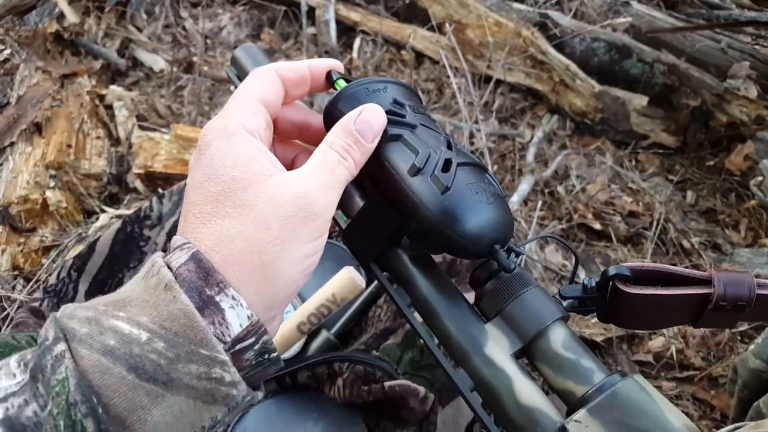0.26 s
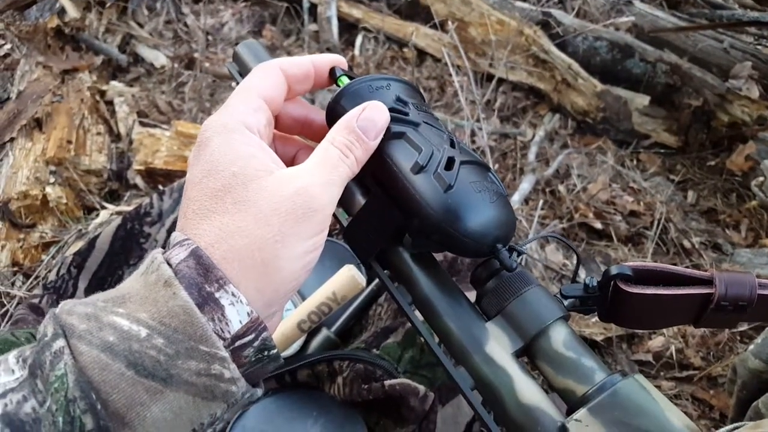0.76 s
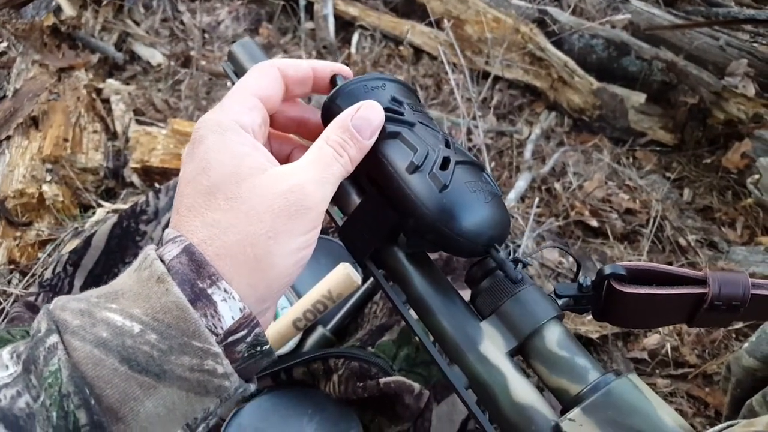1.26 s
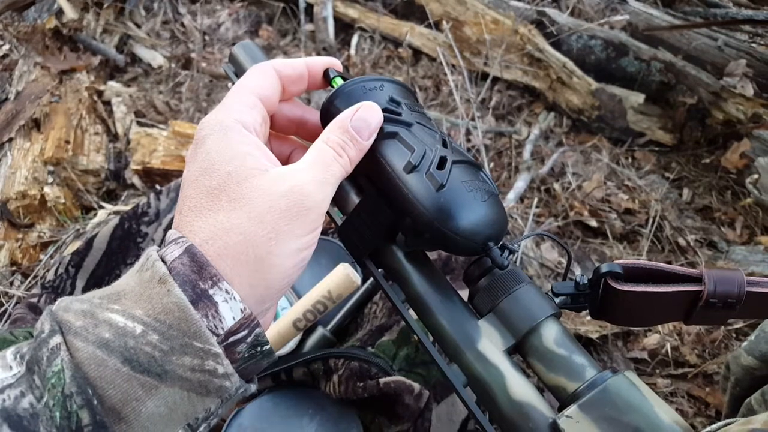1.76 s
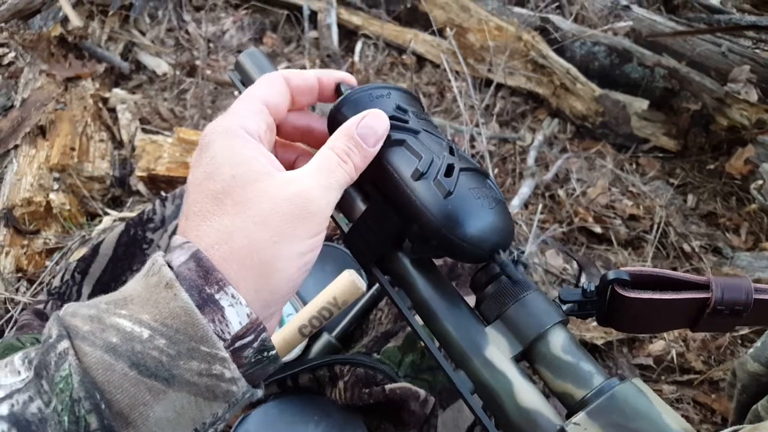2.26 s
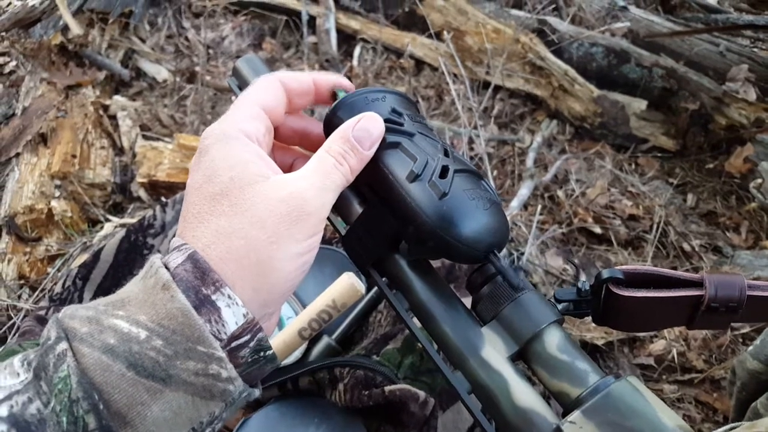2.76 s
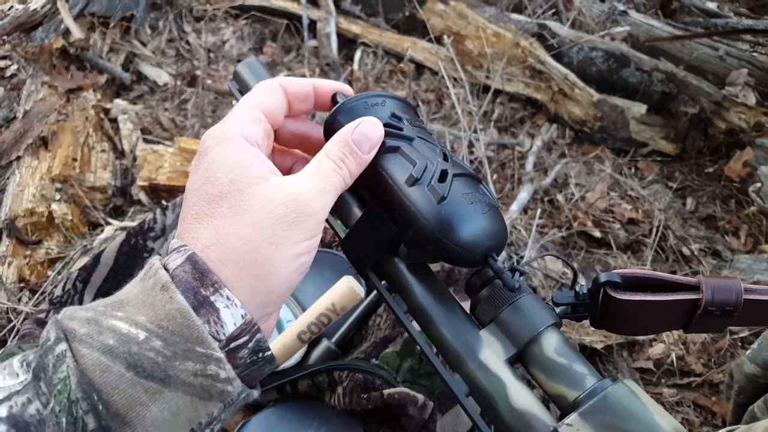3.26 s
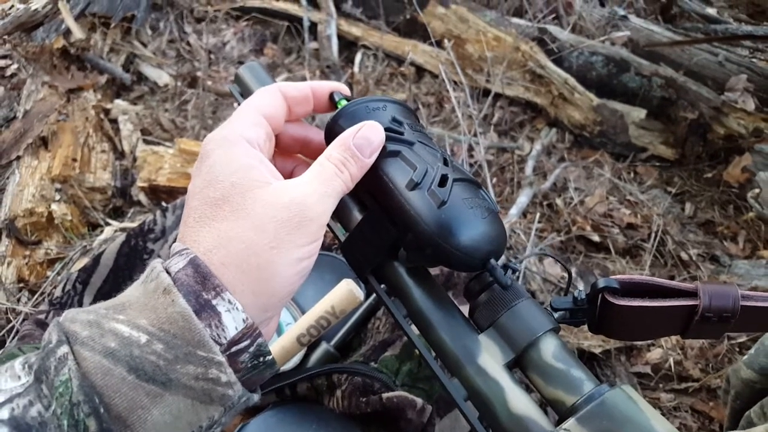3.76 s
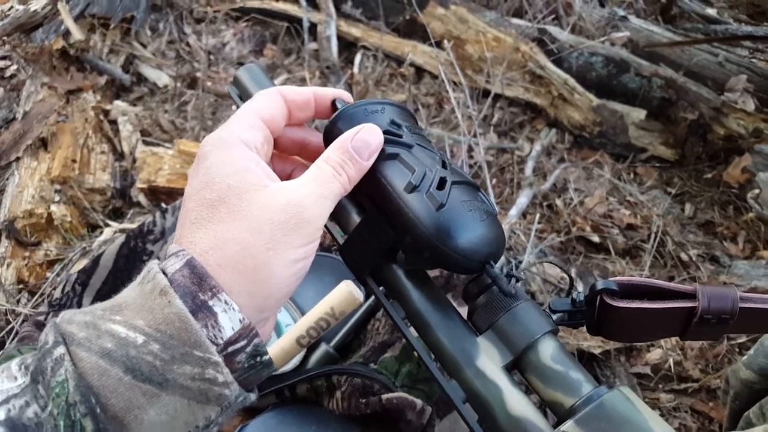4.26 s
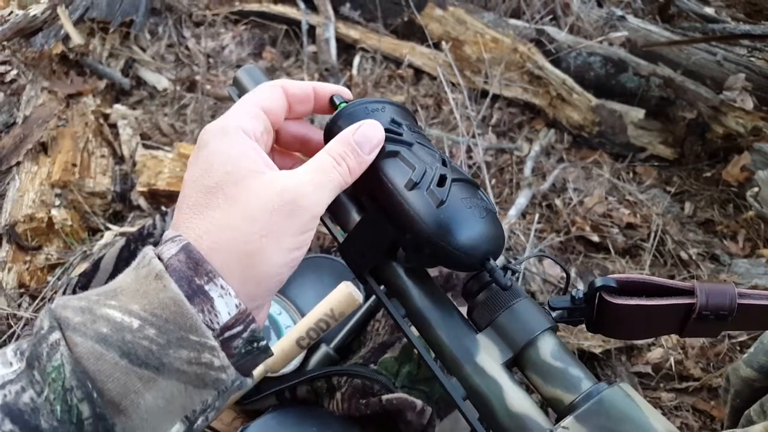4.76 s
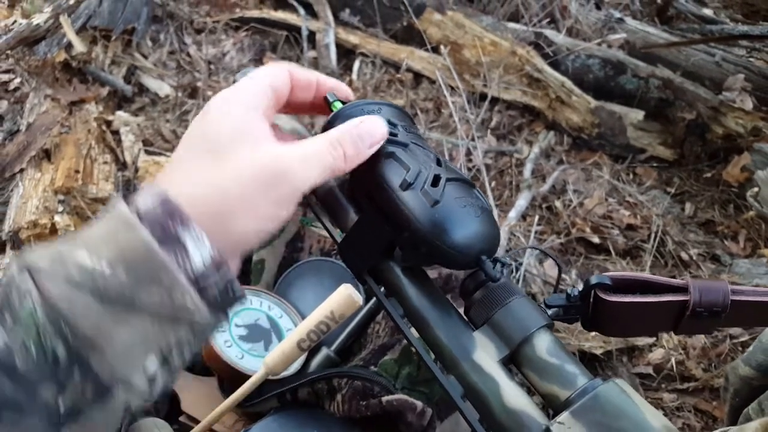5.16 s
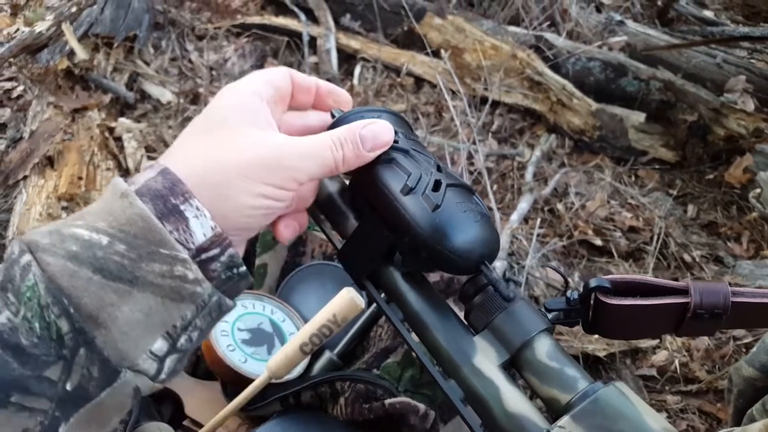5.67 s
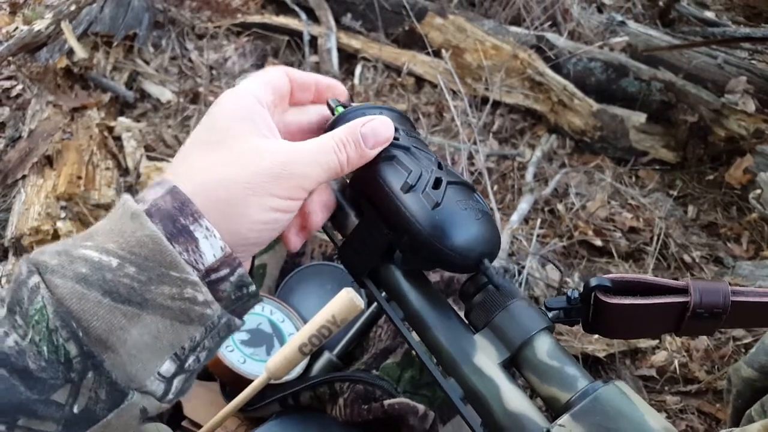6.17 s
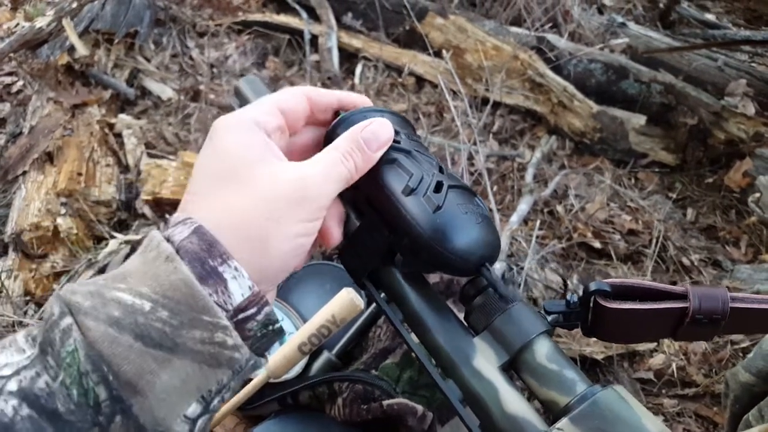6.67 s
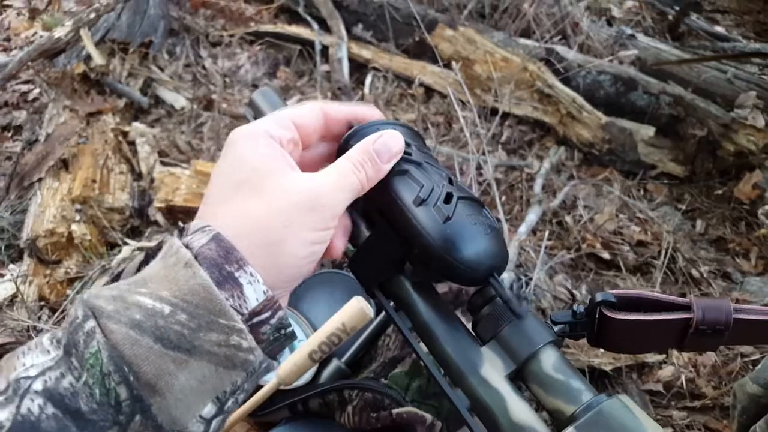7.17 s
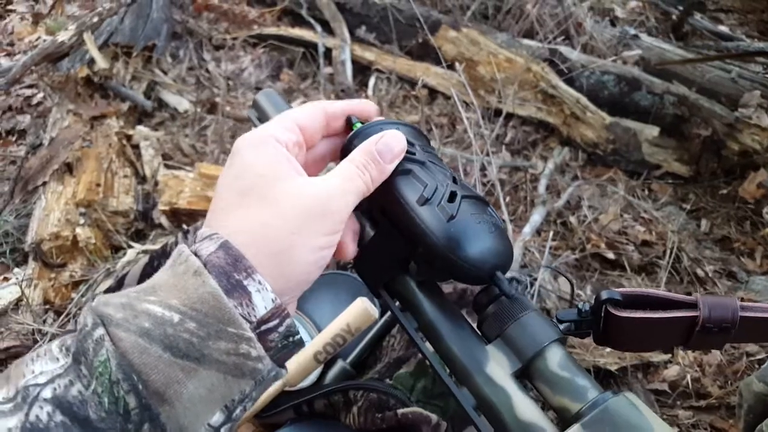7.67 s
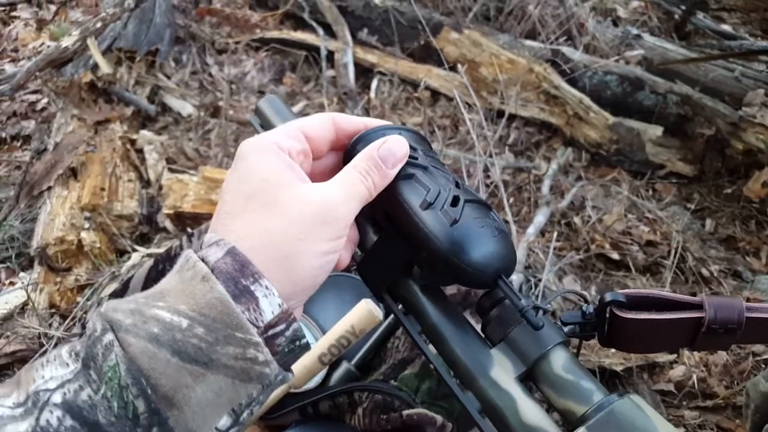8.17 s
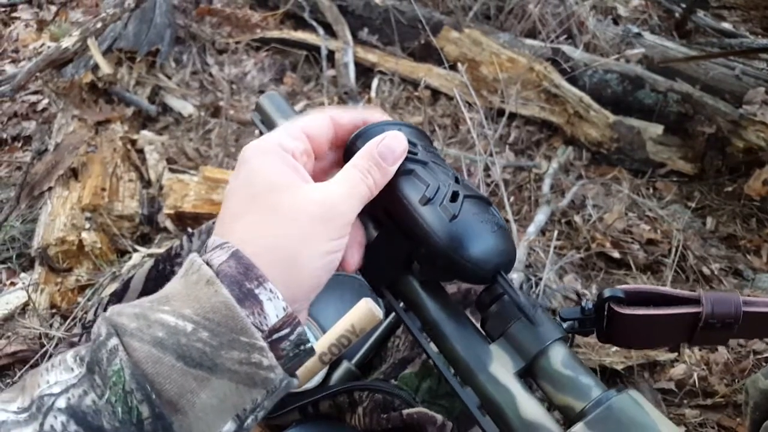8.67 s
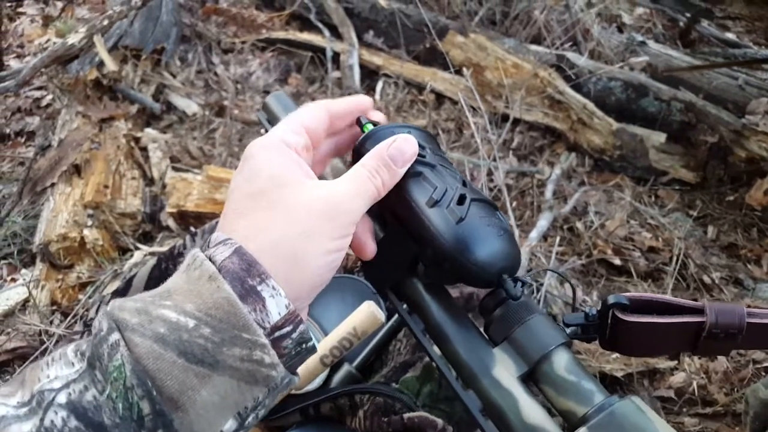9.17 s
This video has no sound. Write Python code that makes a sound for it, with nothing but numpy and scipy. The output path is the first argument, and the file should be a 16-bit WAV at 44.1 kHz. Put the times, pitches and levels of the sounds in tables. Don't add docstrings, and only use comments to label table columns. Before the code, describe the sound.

Very close, a hollow plastic push-peg call makes short, raspy, nasal clucks. Five come spaced apart, then a rapid flurry of tiny chirps, four quick clucks, a pair of smoother yelps and an even run of clucks that gradually softens. Small ticks and faint scrapes of the returning peg fill gaps. Quiet open woods, distant thin birdsong, low engine hum, soft hiss; close stereo camera microphone.

```python
import sys
import numpy as np
from scipy import signal
from scipy.io import wavfile
from scipy.ndimage import uniform_filter1d, minimum_filter1d

SR = 44100
rng = np.random.default_rng(int(sys.argv[2]) if len(sys.argv) > 2 else 0)


def volts(x):
    e = np.asarray(x, float) / 20
    return 10 ** e


def log_audio(samples):
    frames = np.atleast_2d(samples).T
    limited = np.clip(frames, -1, 1)
    pcm = np.round(limited * 32767).astype(np.int16)
    wavfile.write(sys.argv[1], SR, pcm)


N = 414981

# [f/Hz, density/dB per Hz]
HUSH = [(24, -34), (40, -1), (54, -7), (109, -7), (198, -12), (248, -11), (710, -16), (1500, -18),
        (3990, -26), (7460, -31), (9820, -37), (13500, -30), (15800, -29.5)]
HUSH_DB = -70
# [f/Hz, correlation 0-1]
SAME = [(40, 0.9), (100, 0.8), (160, 0.4), (300, 0.32), (700, 0.077)]
# [t/s, f/Hz, level/dB]
HUM = [(0.0, 104.3, -78.5), (3.6, 108.3, -82.5), (3.9, 104.3, -75.5), (6.503, 105.9, -77.5),
       (7.002, 105.6, -82.5), (9.41, 113.4, -86)]
# [t/s, level/dB]
BREEZE = [(0.0, -78), (2.202, -81), (4.001, -77), (5.801, -74), (7.798, -91.5), (8.8, -84), (9.41, -90)]
# [t/s, level/dB]
FIZZ = [(0, 2), (2.001, 2.5), (3.5, 1), (4.2, 5.5), (5.2, 3.5), (6.2, 7.5), (6.801, 1), (9.1, 0),
        (9.3, -8.5), (9.41, -6)]

# [t/s, hold/s, release/s, level/dB, chalk over usual grit/dB]
CLUCKS = [(0.538, .038, .006, -8.5, 1), (1.24, 0.044, .023, -10.5, -0.5), (2.145, .041, .031, -9.5, 2),
          (2.783, 0.068, .015, -12, -3), (3.238, .052, .01, -10.5, -2.5), (4.262, .042, .019, -8, 0.1),
          (4.455, 0.041, 0.01, -8, 0.25), (4.713, 0.037, .013, -10, -2.5), (4.971, 0.043, .008, -8.5, -1),
          (6.028, 0.051, .013, -9.5, -0.64), (6.221, 0.051, .007, -11, -1), (6.57, 0.051, .025, -11, -2.5),
          (6.882, 0.084, .002, -13, -4), (7.184, .056, .021, -13.5, 0), (7.496, 0.073, .012, -14, -4.5),
          (7.798, 0.081, .009, -15, -3.5), (8.109, .066, .007, -13.5, -1), (8.405, 0.053, .018, -15.5, -1),
          (8.69, 0.064, 0.01, -16, 0.5), (8.997, 0.053, 0.0038, -17.5, 1.7)]
# [t/s, level/dB, slip rate f/Hz]
YELPS = [
    [(5.568, -51, 1000), (5.58, -20, 1000), (5.587, -14, 780), (5.597, -12.5, 685), (5.624, -12.5, 670),
     (5.63, -13, 765), (5.658, -15, 815), (5.666, -20, 930), (5.69, -47.5, 1050)],
    [(5.694, -40.5, 1000), (5.703, -23.5, 950), (5.708, -12, 800), (5.722, -13, 700), (5.745, -13, 710),
     (5.751, -17.5, 820), (5.755, -26, 960), (5.8, -23.5, 980), (5.83, -58, 960)],
]
# [t/s, level/dB, slip rate f/Hz]
CHIRPS = [
    [(3.785, -42, 960), (3.792, -23, 1020), (3.797, -18.5, 880), (3.801, -10.5, 775), (3.809, -12.5, 644),
     (3.816, -13.5, 930), (3.822, -20, 900), (3.83, -28.5, 950), (3.838, -41, 1600)],
    [(3.84, -40.5, 1000), (3.848, -19.5, 960), (3.853, -17.5, 830), (3.858, -11.5, 785),
     (3.866, -12.5, 790), (3.87, -19.5, 880), (3.877, -24.5, 1000), (3.888, -43, 1050)],
    [(3.89, -43, 1000), (3.899, -27.5, 960), (3.904, -21, 850), (3.91, -11, 790), (3.92, -13, 810),
     (3.927, -21.5, 900), (3.932, -23, 1000), (3.936, -27.5, 1000)],
    [(3.937, -26, 1000), (3.943, -23, 940), (3.948, -9.5, 770), (3.956, -12, 690), (3.963, -13.5, 740),
     (3.968, -14, 700), (3.973, -12.5, 800), (3.976, -22.5, 870), (3.979, -23, 880)],
    [(3.98, -27, 870), (3.99, -19.5, 830), (3.998, -10.5, 800), (4.007, -15.5, 830), (4.012, -23, 1080),
     (4.017, -30.5, 870), (4.022, -39.5, 1080)],
    [(4.023, -36, 900), (4.029, -26.5, 950), (4.034, -16, 810), (4.039, -13.5, 830), (4.046, -21, 850),
     (4.05, -21, 990), (4.057, -30.5, 1070), (4.064, -56, 1530)],
]
# [t/s, level/dB, slip rate f/Hz]
AFTERS = [
    [(5.012, -19.5, 900), (5.02, -22.5, 900), (5.026, -13, 770), (5.036, -12.5, 710), (5.043, -15.5, 740),
     (5.05, -22.5, 930), (5.064, -54.5, 1050)],
    [(6.962, -16.5, 830), (6.967, -19.5, 850), (6.972, -27.5, 850), (6.986, -20, 815), (6.998, -16, 815),
     (7.006, -19.5, 860), (7.012, -29, 980), (7.024, -54.5, 1050)],
]
# [t/s, level/dB, grit/dB, slip rate f/Hz, roughness 0-1]
CATCH = [
    (0, -19.5, -7, 1040, .05),
    (.004, -9, -5.5, 960, .1),
    (.008, 1, -4.5, 760, .25),
    (.016, 0, 0, 680, .7),
]
# [share of the hold after the catch, level/dB, grit/dB, slip rate f/Hz, roughness 0-1]
DEEPEST = (.45, 0, 0, 630, .8)
# [t/s, level/dB, grit/dB, slip rate f/Hz, roughness 0-1]
EASE = [
    (-.006, -0.5, -3, 756, 0.39),
    (0, -3, -7.5, 877.5, 0.51),
]
# [share of the release, level/dB, grit/dB, slip rate f/Hz, roughness 0-1]
LIFT = (.6, -12, -13, 930, .3)
GONE = (1, -24, -14, 1040, .28)
DIE_S, DIE_DB = .0045, -22
GRIT_DB, BITE_DB, BARER_DB_PER_S = -40, -41, 1.56
# [low f/Hz, high f/Hz]
GRIT_HZ = (3500, 9000)
CLEAR_HZ, HOARSE_SPAN_HZ, LEAST_ROUGH = 780, 450, .03
GENTLE_GRIT_DB, GRIT_FOLLOWS, CREST_DB = -58, .8, 3
# [t/s, depth/dB]
LAPSES = [
    (3.808, -5.5),
    (3.955, -7),
    (3.967, -4),
    (5.6, -3),
    (5.613, -4.5),
    (5.622, -6),
    (5.642, -8.5),
    (5.657, -8),
    (5.777, -6),
    (5.726, -3.5),
]
# [t/s, peak level/dB]
SLAMS = [(0.5489, -20.5), (0.5609, -15.0), (1.2629, -16.5), (2.1631, -16.5), (2.17, -13), (2.808, -14),
         (2.813, -16.5), (3.2531, -21), (3.2705, -21), (4.274, -16), (4.2815, -19), (4.4688, -17.5),
         (4.4787, -18), (4.7295, -19.0), (4.7381, -16), (4.9907, -18.5), (4.9998, -20.5), (6.0504, -23.5),
         (6.0588, -20), (6.0668, -18), (6.072, -15), (6.2398, -16.5), (6.2466, -14.5), (6.252, -10.5),
         (6.2634, -18.0), (6.5821, -16.5), (6.5943, -11.5), (6.6, -13.0), (6.897, -24), (6.909, -14.0),
         (6.9182, -15), (6.9507, -18.5), (7.2042, -16), (7.2107, -15.5), (7.2176, -16), (7.2231, -15),
         (7.5229, -14.5), (7.5303, -14.0), (7.536, -11.5), (7.5423, -15.5), (7.8206, -17), (7.8273, -10.5),
         (7.8338, -11.5), (7.84, -13.5), (8.134, -10), (8.1399, -15), (8.1465, -13), (8.1538, -12.5),
         (8.4241, -13), (8.431, -15), (8.4379, -9), (8.444, -14), (8.7113, -15), (8.718, -10),
         (8.7258, -13.5), (8.7341, -16), (9.0143, -13.5), (9.0205, -11.0), (9.0304, -17), (9.0447, -16)]
RATTLE_HZ, KNOCK_LAG_S, SLAM_DB = 158, .001, 30

# [f/Hz, level/dB]
LEFT = [(60, -54.5), (165, -29), (300, -30.5), (650, -27.5), (1000, -16), (1500, -7), (1950, -5),
        (2200, -8.5), (3400, -34.5), (5900, -30), (7000, -46.5), (8300, -66), (10500, -69), (12200, -55.5)]
RIGHT = [(60, -47), (165, -28), (300, -26.5), (650, -22.5), (1000, -16), (1500, -2), (1950, 4), (2150, -11),
         (3200, -14.5), (3700, -25.5), (6300, -44), (7500, -31.5), (9300, -63), (12000, -63)]
# [f/Hz, width/Hz, level/dB]
SHELL = [(1050, 279, 13), (1256, 340, 10.5), (1510, 280, 8), (2400, 110, 1), (2840, 280, 6.5),
         (3850, 48, 5.5), (4160, 38, 9.5), (5000, 310, -3), (6082, 130, 2), (7355, 570, -7.5),
         (8820, 170, -13.5), (9700, 200, -17), (10300, 390, -16), (15100, 900, -5.5), (16700, 640, -33)]
# [f/Hz, phase/rad]
LEAD = [(100, 0), (1550, -.3), (1900, 1.5), (2700, 1.3), (3300, -.8), (4200, 1.9), (4800, 1), (5800, 1.8),
        (6500, -1.6), (8000, .3), (16000, -6)]
# [f/Hz, level/dB, t60/s]
BARREL = [(940, -38, 1), (1140, -52.5, .5), (1340, -48, 1), (1340, -55, 0.75), (1560, -44, 0.55),
          (2100, -41.5, .15), (3170, -41, 0.33), (3430, -40.5, .3), (4900, -35, .25), (5900, -39, .25)]
# [f/Hz, t60/s]
WOODS = [(500, .35), (1000, 0.75), (1500, 1), (4000, 0.37)]

# [t/s, peak level/dB, ring f/Hz]
TICKS = [(0.644, -30, 474), (0.721, -32, 1470), (0.791, -38.5, 474), (1.426, -39.5, 1430),
         (2.241, -46, 1510), (2.38, -37.5, 1610), (2.986, -35.5, 1470), (3.105, -43, 455),
         (3.47, -38.5, 1430), (4.368, -39.5, 1480), (4.423, -36.5, 1480), (5.152, -32, 1340),
         (5.2, -65.5, 1050), (6.399, -28.5, 1590), (6.794, -35.5, 1590), (7.153, -36, 1150),
         (7.459, -52.5, 1320), (8.258, -44.5, 1490), (8.642, -35.5, 1420), (8.772, -42.5, 482),
         (8.836, -33.5, 2260), (8.924, -27.5, 1490), (9.094, -37.5, 1490), (9.176, -32.5, 1490)]
# [t/s, length/s, scrape level/dB, wall ring over scrape/dB]
RETURNS = [(0.661, 0.074, -52.5, -8.5), (1.358, 0.087, -52.5, -11.5), (2.27, 0.12, -58.5, -6),
           (2.905, 0.096, -52.5, -12), (3.392, 0.077, -52.5, -11.5), (4.149, .084, -52.5, -1.5),
           (4.35, .079, -54, -7.5), (4.575, 0.085, -53, -14), (4.836, 0.045, -51, -11.5),
           (5.13, 0.075, -50.5, -4), (5.914, 0.072, -53.5, 8.5), (6.143, 0.064, -53.5, -3.5),
           (6.311, 0.11, -53, 0.5), (6.712, 0.068, -54, 1.5), (7.082, .072, -56.5, 10.5),
           (7.369, .085, -57.5, 4), (7.647, 0.099, -59, 6.5), (7.97, 0.097, -58, 8.5),
           (8.261, 0.093, -55.5, 6.5), (8.542, 0.09, -58.5, 6), (8.829, 0.11, -58.5, 5),
           (9.087, 0.11, -60, 5)]
RETURN_HISS_DB = -62.5
# [f/Hz, level/dB]
SLIDE = [(300, 2.5), (600, 24.5), (800, -11.5), (1100, 1), (1500, -4), (2300, -6.5), (3100, 4.5),
         (3800, 16.5), (4500, -4)]

# [t/s, top f/Hz, level/dB]
BIRD = [(1, 7200, -82.5), (1.065, 6780, -75), (1.115, 7280, -70), (1.2, 7360, -67), (1.319, 7400, -66.5),
        (1.402, 7300, -71), (1.511, 7230, -69), (1.601, 7220, -69.5), (1.708, 7290, -72),
        (1.805, 7230, -69.5), (5.196, 7550, -66.5), (5.297, 7360, -70), (5.378, 7180, -72),
        (5.466, 7220, -69.5), (5.549, 7100, -73), (5.647, 7350, -67), (5.74, 6970, -69), (5.84, 7190, -71)]
NOTE_S, SWEEP_HZ, LEVELLING = 0.046, 650, 2
CHIP_AFTER_S, CHIP_S, CHIP_TOP_HZ, CHIP_FALL_HZ, CHIP_DB = 0.042, 0.0055, 6300, 891, -5

# [low f/Hz, high f/Hz]
EMPTIED_HZ = [(7700, 10350), (8850, 10300)]
# [low f/Hz, high f/Hz]
PATCHY_HZ = (9150, 10200)
LOUD_OVER_DB, SOFT_OVER_DB = -33, -50


def evened(x):
    return x / np.sqrt(np.mean(x ** 2) + 1e-20)


def read(points, hz):
    f, value = np.transpose(points)
    return np.interp(np.log(hz + 1), np.log(f + 1), value)


def wander(count, hz):
    return evened(signal.lfilter(*signal.butter(2, hz, fs=SR), rng.standard_normal(count)))


def near(f, centre_hz, half_width_hz, order=2):
    return 1 / (1 + ((f - centre_hz) / half_width_hz) ** order)


def below(f, corner_hz, order):
    return 1 / (1 + (f / corner_hz) ** order)


def above(f, corner_hz, order):
    return 1 / (1 + (corner_hz / (f + 1)) ** order)


def engine_hum():
    s, hum_hz, hum_db = np.transpose(HUM)
    t = np.arange(N) / SR
    turns = np.cumsum(np.interp(t, s, hum_hz) * (1 + 0.034 * wander(N, 6))) / SR
    level_db = np.interp(t, s, hum_db) + 6.1 * wander(N, 6.2)
    return np.sqrt(2) * volts(level_db) * np.sin(2 * np.pi * turns)


def hush():
    frames, hz = N // 256 + 5, np.fft.rfftfreq(1024, 1 / SR)
    frame_s, f = np.arange(frames) * 256 / SR, hz[:, None]
    a, b, c, d, patches = rng.standard_normal((frames, 513, 5)).T
    patches = uniform_filter1d(patches, size=12, axis=0)
    patches = evened(uniform_filter1d(patches, size=14, axis=1))
    same, left = np.clip(read(SAME, hz), -1, 1)[:, None], a + 1j * b
    z = np.array([left, same * left + np.sqrt(1 - same ** 2) * (c + 1j * d)])
    ports_db = np.array([4.0 * near(hz, port_hz, 450) for port_hz in (6100, 7500)])[:, :, None]
    ports_db = ports_db - 3.5 * (f > 11500)
    breeze_db = np.interp(frame_s, *np.transpose(BREEZE)) - BREEZE[0][1]
    z *= volts(breeze_db * below(f, 160, 2)) * (f < 15900)
    z *= volts(np.interp(frame_s, *np.transpose(FIZZ)) * above(f, 9500, 8))
    z *= volts(read(HUSH, hz)[:, None] + ports_db + 1.0 * patches)
    noise = signal.istft(z, nperseg=1024, noverlap=768)[1][:, :N]
    noise = signal.lfilter(*signal.butter(2, 45, "highpass", fs=SR), noise)
    return volts(HUSH_DB) * noise / np.std(noise.mean(0)) + engine_hum()


def played(tables):
    tables = sorted(tables)
    ends = [table[0][0] for table in tables[1:]] + [np.inf]
    t = np.arange(N) / SR
    rows = np.array([row for table, end in zip(tables, ends) for row in table if row[0] < end])
    rows = rows[np.argsort(rows[:, 0])]
    level_db, *rest = (np.interp(t, rows[:, 0], column) for column in rows.T[1:])
    moving = np.zeros(N)
    for table in tables:
        moving[round(table[0][0] * SR) - 20:round(table[-1][0] * SR) + 130] = 1
    return uniform_filter1d(moving, size=130) * volts(level_db), *rest


def shell_db(port, hz):
    return read(port, hz) + sum(db * near(hz, f, width / 2) for f, width, db in SHELL)


def heard(x, source_db=lambda hz: 0):
    hz = np.fft.fftfreq(4096, 1 / SR)
    ports_db = np.array([shell_db(port, abs(hz)) for port in (LEFT, RIGHT)])
    log_gain = np.log(volts(ports_db + source_db(abs(hz))))
    phase = -signal.hilbert(log_gain).imag
    phase[1] = phase[0] - np.sign(hz) * read(LEAD, abs(hz))
    taps = np.fft.ifft(np.exp(log_gain + 1j * phase)).real
    taps = np.roll(taps, 256, axis=1)[:, :2048]
    return signal.oaconvolve(x * np.ones((2, 1)), taps, axes=1)[:, 256:N + 256]


def band_rms(x, low_hz, high_hz, where):
    band = signal.butter(4, [low_hz, high_hz], "bandpass", fs=SR, output="sos")
    return np.sqrt(np.average(signal.sosfilt(band, x.mean(0)) ** 2, weights=where))


def air(same=.6):
    a, b = rng.standard_normal((2, N))
    return np.array([a, same * a + np.sqrt(1 - min(same, 1) ** 2) * b])


def dips(rows, width_s):
    db, span = np.zeros(N), np.arange(-400, 401)
    for s, depth_db in rows:
        db[round(s * SR) + span] += depth_db * np.exp(-(span / (width_s * SR)) ** 2)
    return volts(db)


def push(start, held, release, db, chalk_db):
    ease, caught = start + held, start + CATCH[-1][0]
    stages = [(start + s, *row) for s, *row in CATCH]
    stages.append((caught + DEEPEST[0] * (ease - caught), *DEEPEST[1:]))
    stages += [(ease + s, *row) for s, *row in EASE]
    stages += [(ease + share * release, *row) for share, *row in (LIFT, GONE)]
    stages.append((ease + release + DIE_S, GONE[1] + DIE_DB, *GONE[2:]))
    bite_db = BITE_DB + BARER_DB_PER_S * start + 0.94 * chalk_db - db
    chalk_grit_db = GRIT_DB + chalk_db - db
    return [(s, db + more_db, chalk_grit_db + grit_db, hz, rough, bite_db)
            for s, more_db, grit_db, hz, rough in stages]


def gently(table):
    stages = []
    for s, db, hz in table:
        rough = max((CLEAR_HZ - hz) / HOARSE_SPAN_HZ, LEAST_ROUGH)
        grit_db = GENTLE_GRIT_DB + 24 * rough + GRIT_FOLLOWS * (db + 15) - db
        stages.append((s, db + CREST_DB, grit_db, hz, rough, -30))
    return stages


def rattling():
    s = np.array([0] + [s - KNOCK_LAG_S for s, db in SLAMS] + [N / SR])
    t = np.arange(N) / SR
    turns = np.cumsum(np.maximum(np.round(np.diff(s, prepend=0) * RATTLE_HZ), 1))
    halfway = (s[1:] + s[:-1]) / 2
    distance = np.c_[0 * s[1:], np.diff(s) / 2].ravel().tolist() + [0]
    away = np.interp(t, np.sort(np.r_[s, halfway]), distance)
    return 2 * np.pi * (np.interp(t, s, turns) + .25 * np.minimum(away / .02, 1) * wander(N, 15))


def slip_sizes(hz, rough, sharp, rattle, cycle):
    slam = np.maximum(rough - .28, 0) * np.exp(4.5 * (np.cos(rattle) - 1))
    size = 1 + (2. + .6 * sharp) * slam
    size = size * volts(2.2 * rough * np.minimum(rng.standard_normal(N), 1)[cycle])
    light = np.clip((hz - 880) / 60, 0, 1) * np.clip(.8 + .35 * wander(N, 40), 0, 2)
    size *= 1 + .45 * light * (-1.) ** cycle
    size *= 1 - 1.1 * rough * np.exp(2.5 * (np.cos(rattle + 1.3) - 1))
    size /= np.sqrt(uniform_filter1d(size ** 2, size=800))
    size *= volts(-2.5 * rough * np.maximum(wander(N, 70), 0) ** 2)
    size *= dips(LAPSES, .0012)
    return size * dips([(s - KNOCK_LAG_S, -14) for s, db in SLAMS], .001)


def shell_loudness(hz, rough):
    grid = np.linspace(500, 1300, num=60)
    sung = 0
    for k in range(1, 4):
        sung = sung + (volts(shell_db(LEFT, k * grid)) + volts(shell_db(RIGHT, k * grid))) ** 2 / 8
    return np.sqrt((1 - rough) * np.interp(hz, grid, sung) + rough * sung.mean())


def round_slip_db(f):
    slope_db = -11.0 * above(f, 2000, 6) + 4.7 * above(f, 4200, 6)
    return slope_db + 1.9 * near(f, 2080, 130) - 3.5 * near(f, 2400, 180)


def sharp_slip_db(f):
    slope_db = 0.48 * np.log2(np.clip(f, 400, 2600) / 1400) - 5.7 * below(f, 900, 8)
    return slope_db + 2.2 * near(f, 2450, 200) - 3.0 * near(f, 1480, 120)


def peg():
    gentle = [gently(table) for table in YELPS + CHIRPS + AFTERS]
    gain, grit_db, hz, rough, bite_db = played([push(*row) for row in CLUCKS] + gentle)
    rough = np.clip(rough, 0, 1)
    rattle = rattling()
    unsteady = (.011 + .03 * np.clip((hz - 900) / 60, 0, 1)) * wander(N, 130)
    jolted = rough ** 1.25 * (.34 * np.sin(rattle) + .095 * wander(N, 250))
    turns = np.cumsum(hz * (1 + jolted + unsteady)) / SR
    cycle = np.round(turns).astype(int)
    sharp = np.clip((bite_db + 28.5) / 13, 0, 1)
    size = slip_sizes(hz, rough, sharp, rattle, cycle)

    pulses = 14.5 * np.sinc(29 * (turns - cycle)) / np.sinc(turns - cycle) - .5
    octave = .75 * np.clip((hz - 860) / 50, 0, 1) * np.cos(4 * np.pi * turns)
    driven = gain / shell_loudness(hz, rough) * size * (pulses - octave)
    body = heard((1 - sharp) * driven, round_slip_db)
    body += heard(sharp * driven, sharp_slip_db)
    clean = np.clip(1 - rough / 0.26, 0, 1)
    body += heard(clean * driven, lambda f: -30 * below(f, 3300, 6) - 10.0 * above(f, 7000, 8))

    grinding = np.sqrt(size) * (0.74 + np.exp(-(turns % 1) / .25))
    grit = heard(grinding * air(same=0.048), lambda f: -40 * below(f, 3000, 4))
    grit *= gain * volts(grit_db + 2.0) * (0.53 + 1.0 * rough) / band_rms(grit, *GRIT_HZ, gain)
    thump = volts(-58.5) * rough * gain / gain.max() * np.sin(rattle)
    return body + grit + thump


def slams():
    def blow_db(f):
        slope_db = 3.7 * np.log2(np.clip(f, 400, 4500) / 1700)
        return slope_db + 4.5 * near(f, 2450, 200) - 7.8 * above(f, 5500, 6)

    blows = np.zeros(N)
    for s, db in SLAMS:
        blows[round((s - KNOCK_LAG_S) * SR)] = -volts(db + SLAM_DB)
    return heard(blows, blow_db)


def barrel(call):
    t = np.arange(SR // 2) / SR
    ring = np.zeros(len(t))
    for hz, db, t60 in BARREL:
        mode = volts(db - 60 * t / t60) * wander(len(t), 30) * np.sin(2 * np.pi * hz * t)
        ring += mode * np.log(1000) / (t60 * SR) * 20
    return signal.oaconvolve(call, ring[None], axes=1)[:, :N]


def woods(x):
    taps = np.zeros((2, SR))
    at = np.arange(400, SR - 20, 20) + rng.integers(0, 20, (2, (SR - 401) // 20))
    np.put_along_axis(taps, at, rng.choice([-1., 1.], at.shape), 1)
    hz, t, z = signal.stft(taps, SR, nperseg=256)
    tail = signal.istft(z * volts(-60 * t / read(WOODS, hz)[:, None]), SR, nperseg=256)[1]
    return signal.fftconvolve(x[None], tail / np.linalg.norm(tail[0]), axes=1)[:, :N]


def ticks():
    def snap_db(f):
        return 20.0 * np.log2(1 + f / 2500) - 5.5 * near(f, 1400, 600) - 16.0 * above(f, 10000, 10)

    snap, ring, t = np.zeros(N), np.zeros(N), np.arange(900) / SR
    for s, db, hz in TICKS:
        at, low = round(s * SR), hz < 800
        snap[at:at + len(t)] += volts(db - 9.0 - 17 * low - 60 * t / 0.025) * rng.standard_normal(len(t))
        ring[at:at + len(t)] += volts(db - 7.5 - 60 * t / 0.021) * np.sin(2 * np.pi * hz * t) * low
    return heard(snap, snap_db) + ring


def slide_back(start, length, db, wall):
    end, hiss = start + length, RETURN_HISS_DB - db
    return [(start, db - 10, hiss - 4, wall - 6),
            (start + .015, db, hiss + 1.5, wall - 3),
            (start + .035, db + 1.5, hiss + 1.5, wall + 1.5),
            (end - .008, db - 0.5, hiss - 5, wall - 6.0),
            (end + 0.03, db - 18.5, hiss - 8, wall - 8.0)]


def spring():
    def scrape_db(f):
        return read(SLIDE, f) - 30 * above(f, 5000, 6)

    def wall_mode_db(f):
        return -35 + 35 * near(f, 2380, 230) + 30 * near(f, 3050, 330, 4)

    def thin_hiss_db(f):
        return 13.0 * near(f, 6400, 500) - 30 * below(f, 4200, 6) + 7.0 * above(f, 10500, 12)

    gain, hiss_db, wall_db = played([slide_back(*row) for row in RETURNS])
    grains = volts(1.4 * np.minimum(rng.exponential(1, N), 4))
    grains = grains * (rng.random(N) < 7000 / SR)
    grains = grains * volts(2.2 * wander(N, 60))
    low = heard(grains * air(same=0.85), scrape_db)
    wall = heard(grains * air(same=.93), wall_mode_db)
    high = heard(grains * air(same=0.94), thin_hiss_db)
    scrape = volts(-1.5) * low / band_rms(low, 900, 3500, gain)
    ring = volts(wall_db - 1.5) * wall / band_rms(wall, 2100, 2600, gain)
    hiss = volts(hiss_db) * high / band_rms(high, 5000, 8500, gain)
    return gain * (scrape + ring + hiss)


def bird():
    out = np.zeros(N)
    u, v = np.linspace(0, 1, round(NOTE_S * SR)), np.linspace(0, 1, round(CHIP_S * SR))
    chip = np.sin(np.pi * v) * np.sin(2 * np.pi * np.cumsum(CHIP_TOP_HZ - CHIP_FALL_HZ * v) / SR)
    for s, top_hz, db in BIRD:
        hz = top_hz - SWEEP_HZ * (1 - u) ** LEVELLING
        note = np.sin(np.pi * u) * np.sin(2 * np.pi * np.cumsum(hz) / SR)
        out[round(s * SR):][:len(u)] += volts(db) * note
        out[round((s + CHIP_AFTER_S) * SR):][:len(v)] += volts(db + CHIP_DB) * chip
    return out * volts(5.2 * wander(N, 120))


def sleeve():
    def brush_db(f):
        return -6.0 * abs(np.log2((f + 1) / 950)) - 12 * above(f, 1250, 8)

    start_s, length_s, level_db = 5.1, 0.44, -69
    t = np.arange(N) / SR
    shape = np.sin(np.pi * np.clip((t - start_s) / length_s, 0, 1)) * volts(3.0 * wander(N, 25))
    return volts(level_db) * shape * evened(heard(air(same=0.87), brush_db))


def scene():
    call, song = peg() + slams() + spring() + ticks() + sleeve(), bird()
    song_ports = song * volts(np.array([[-2], [2.5]]))
    return call + barrel(call) + song_ports + woods(volts(-50.5) * call.mean(0) + song) + hush()


def emptied(x):
    hz, t, z = signal.stft(x, SR, nperseg=1024)
    level_db = 10 * np.log10((abs(z) ** 2).sum(1).mean(0) + 1e-12)
    soft = level_db > SOFT_OVER_DB
    loud = (level_db > LOUD_OVER_DB) & (np.roll(level_db, 1) > SOFT_OVER_DB)

    def within(low, high):
        return ((hz > low) & (hz < high))[:, None]

    band, frame = np.arange(len(hz)) // 12, np.arange(len(t)) // 4
    chance, step = rng.random((2, 2, band[-1] + 1, frame[-1] + 1))[:, :, band][..., frame]
    keep = 1 - np.array([within(*edges) & loud for edges in EMPTIED_HZ])
    keep = keep * ~(within(*PATCHY_HZ) & soft & (chance < .6))
    keep = keep * ~(within(10300, SR) & loud & (chance < .16))
    uneven_db = 2.5 * np.sqrt(12) * (step - .5)
    keep = keep * volts(uneven_db * (within(3400, SR) & loud))
    return signal.istft(z * keep, SR, nperseg=1024)[1][:, :N]


def low_pass(x):
    return signal.sosfilt(signal.butter(12, 16000, fs=SR, output="sos"), x)


def record(dry):
    room = minimum_filter1d(.98 / np.maximum(abs(dry).max(0), .98), size=121)
    limited = dry * uniform_filter1d(room, size=121)
    mix = emptied(limited) - .0004
    return low_pass(mix)


dry = scene()
out = record(dry)
log_audio(out)
```